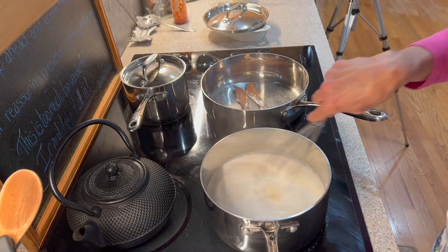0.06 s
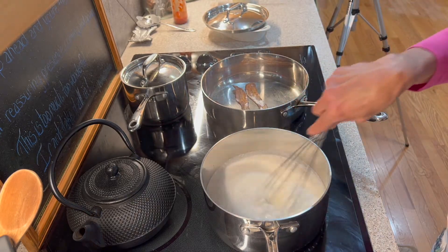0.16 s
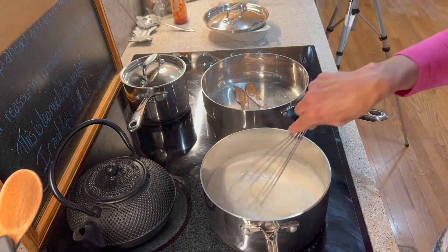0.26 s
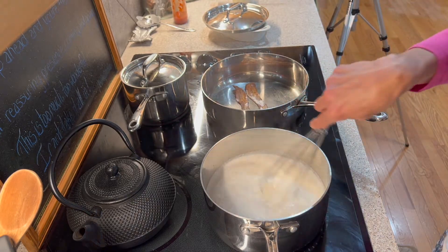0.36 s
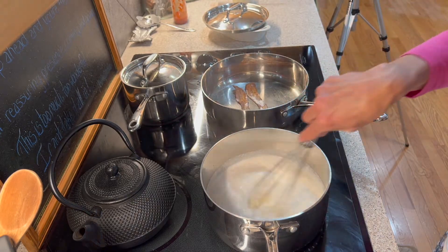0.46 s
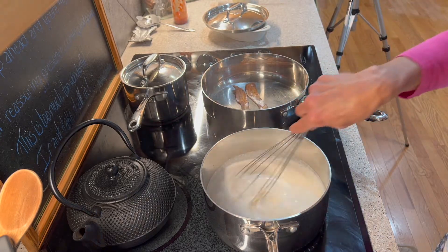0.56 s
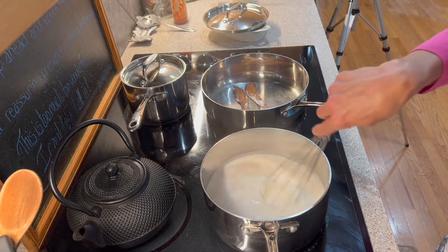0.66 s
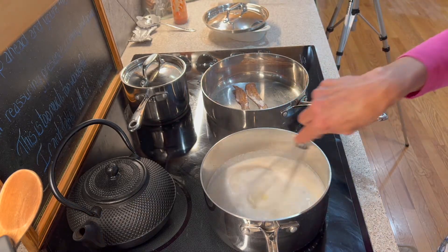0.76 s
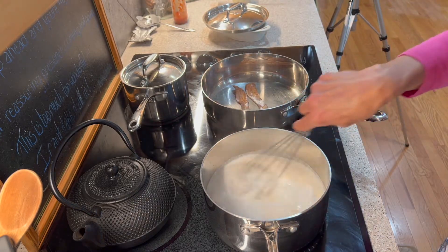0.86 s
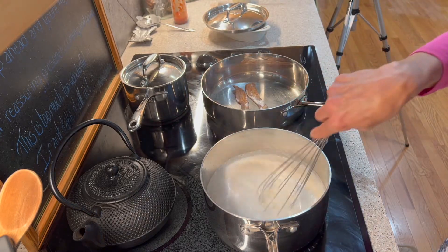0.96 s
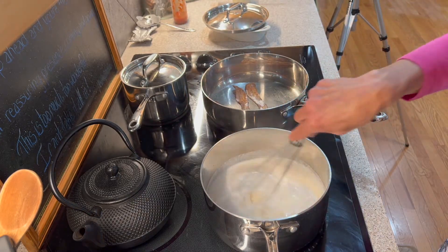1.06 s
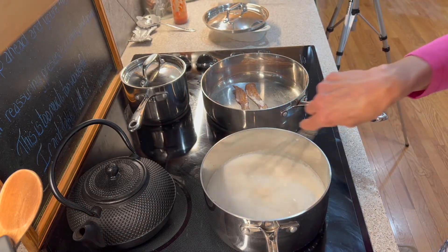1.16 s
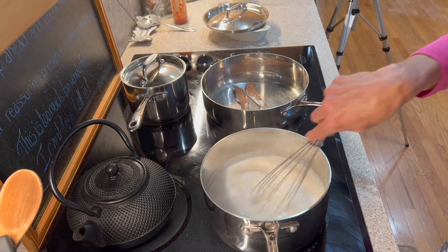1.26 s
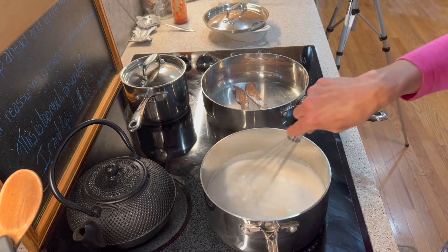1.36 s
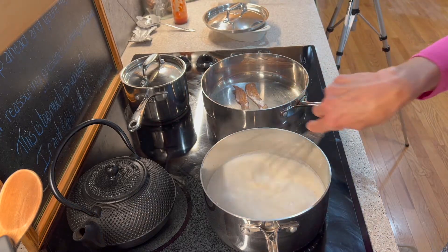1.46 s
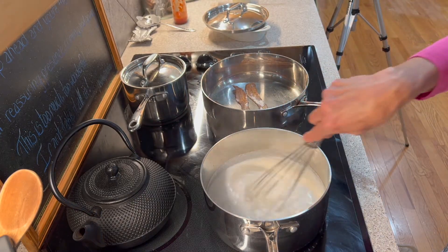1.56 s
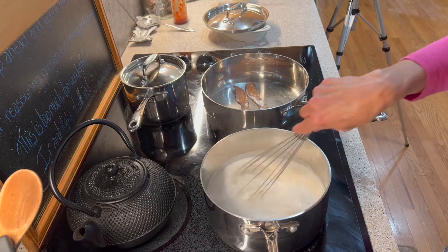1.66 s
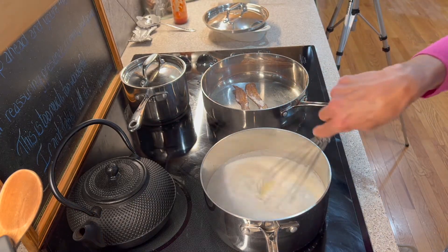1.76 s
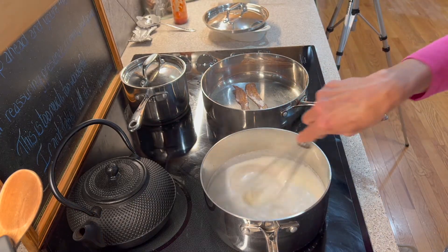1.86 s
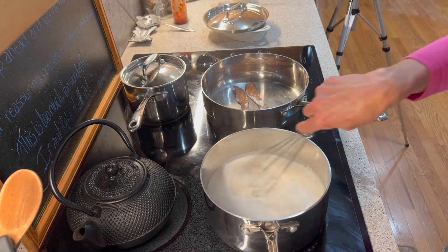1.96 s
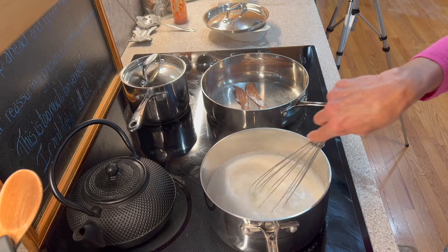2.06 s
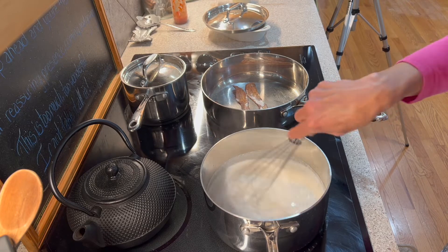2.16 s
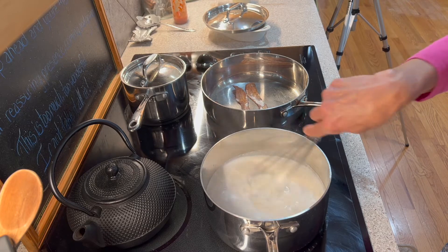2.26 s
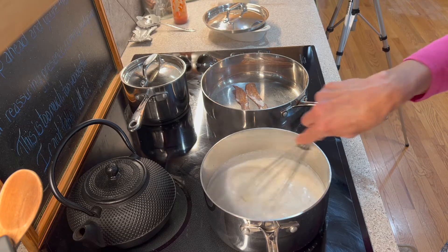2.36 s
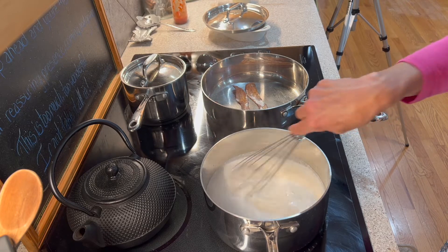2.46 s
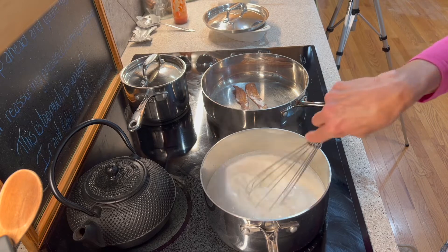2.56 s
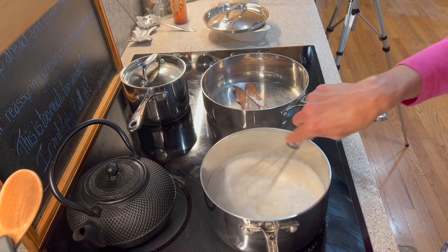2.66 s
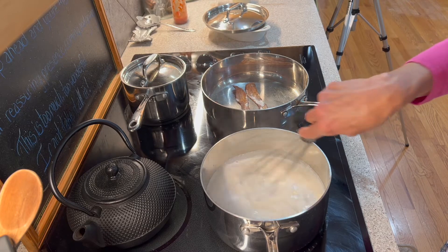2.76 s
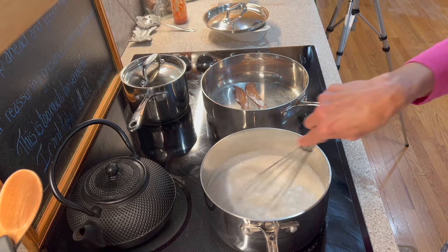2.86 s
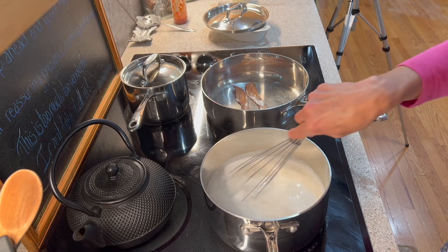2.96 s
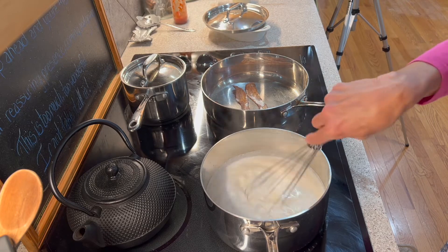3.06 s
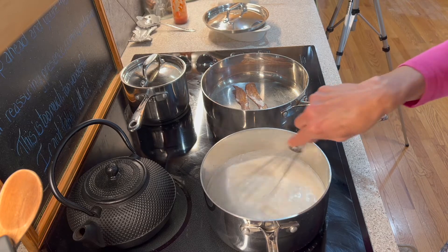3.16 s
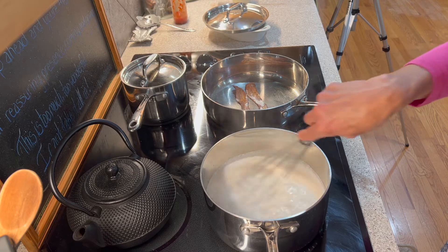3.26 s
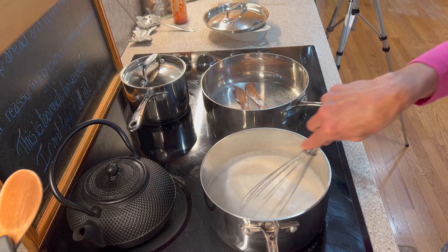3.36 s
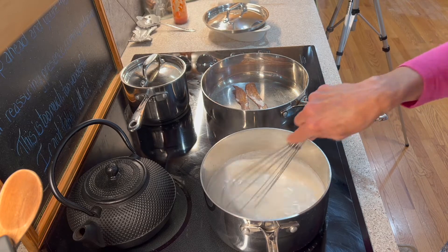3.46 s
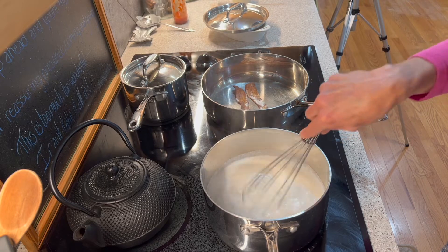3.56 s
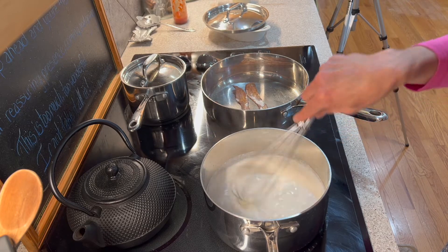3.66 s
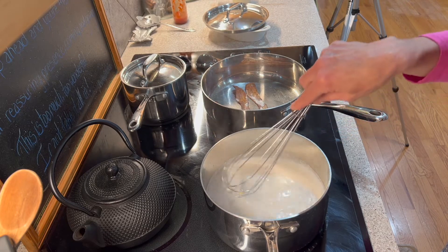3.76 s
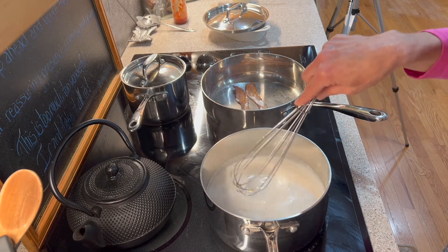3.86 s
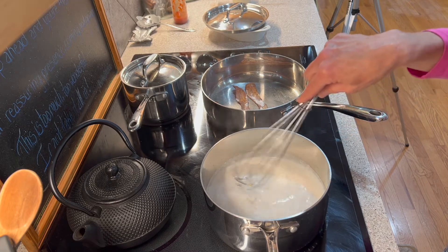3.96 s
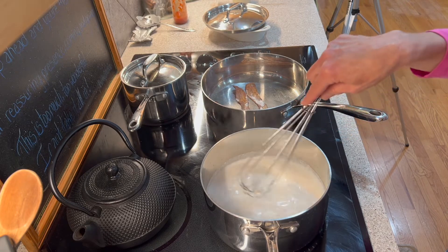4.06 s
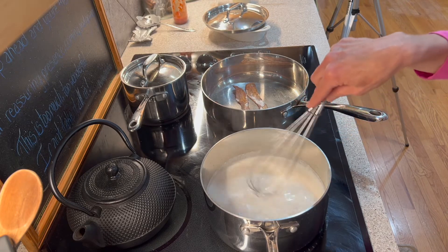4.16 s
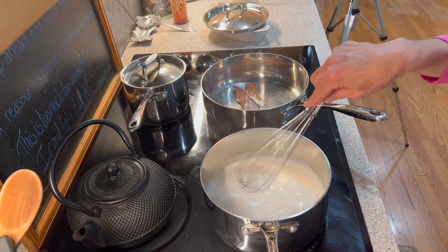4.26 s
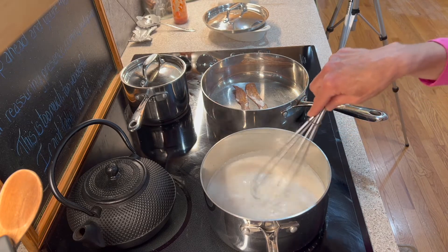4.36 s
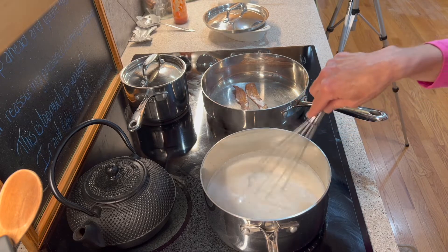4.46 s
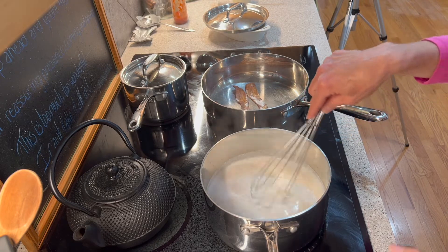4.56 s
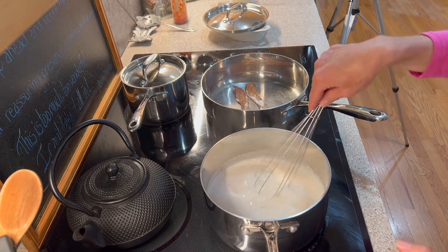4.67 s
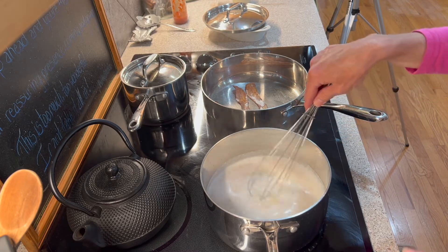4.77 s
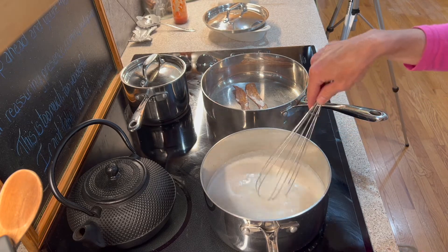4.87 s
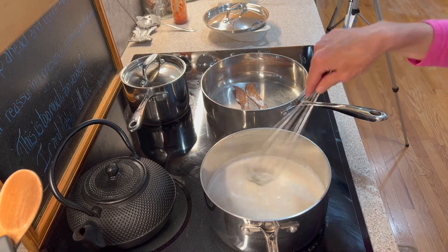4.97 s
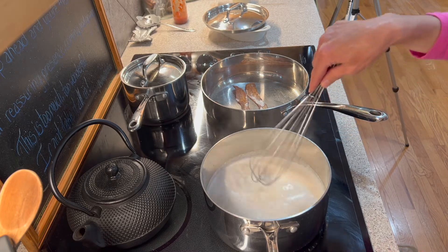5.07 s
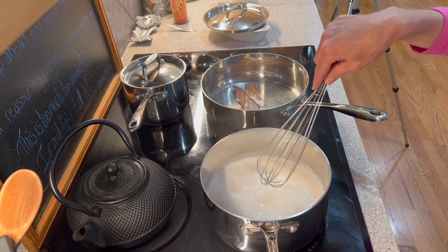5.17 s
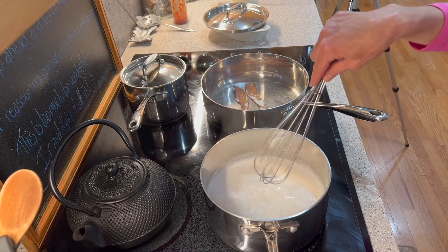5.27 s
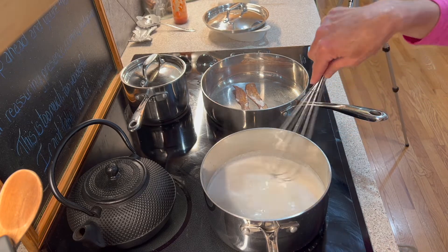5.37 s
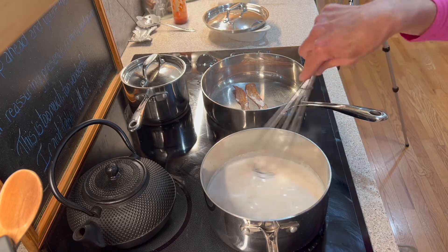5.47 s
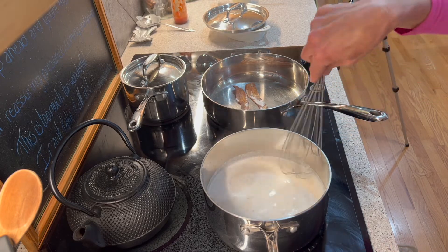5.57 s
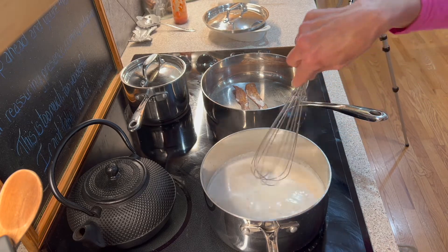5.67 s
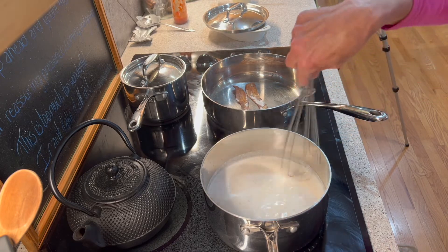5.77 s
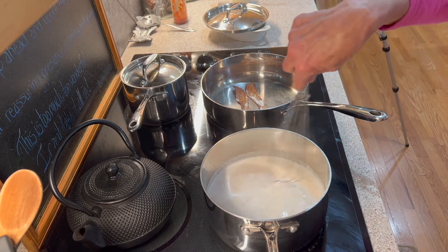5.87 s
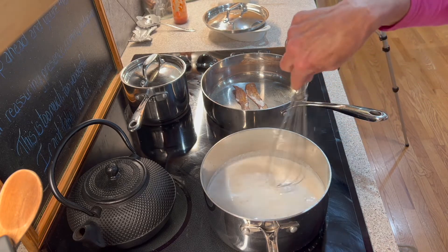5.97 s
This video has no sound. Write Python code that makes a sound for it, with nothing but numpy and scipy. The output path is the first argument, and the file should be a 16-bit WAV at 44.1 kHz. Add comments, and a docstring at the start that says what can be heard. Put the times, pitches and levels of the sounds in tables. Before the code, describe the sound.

A close microphone catches brisk, regular whisking: soft wet slosh, wiry metal scrape and airy swish, with occasional dull clunks and ticks. After about three and a half seconds it stops, leaving quiet sizzling, faint stirring and small plops. Finally the whisk is tapped three times on the pan rim, loud, rattling and briefly ringing in a small room.

```python
"""In a small kitchen, a wire whisk circles through grits in a steel pan, nearly four turns a second.
Each turn is shaped noise: a slosh of pushed grits, a scrape of dragged wires and a hiss of sweeping tips.
Stray knocks are ticks, pings and damped modes; after the whisk stops, bubbles plop and a faint stir grows.
Three raps on the rim, the first one double, make the wires rattle and the pan ring.
Bacon sizzles faintly in the next pan as filtered grains, over a low rumble of filtered noise."""
import sys
import numpy as np
from scipy import signal
from scipy.fft import rfft, irfft
from scipy.io import wavfile

SR = 44100
rng = np.random.default_rng(int(sys.argv[2]) if len(sys.argv) > 2 else 0)


def wav_out(sig):
    """Save sig, one row per channel (or a flat mono array), as 16-bit PCM at SR to the path in sys.argv[1]."""
    wavfile.write(sys.argv[1], SR, np.round(np.clip(np.atleast_2d(sig).T, -1, 1) * 32767).astype(np.int16))


N = 264587

# turns of the whisk: (time of the push [s], slosh [dB], scrape [dB], hiss of the wire tips [dB],
# delay from push to sweep [s], negative if the sweep comes first)
TURNS = [(.175, -54.5, -56, -52.5, 0.065), (.44, -62, -57.5, -57, 0.065), (.715, -60, -57, -50.5, .075),
         (1.0, -61, -55.5, -50, 0.079), (1.265, -60, -57.5, -57, 0.065),
         (1.531, -55.5, -55.5, -51.5, 0.098), (1.795, -62.5, -55, -49, 0.088),
         (2.056, -56.5, -55.5, -50, 0.084), (2.32, -56.5, -56, -53.5, .078), (2.575, -60, -55, -57, 0.073),
         (2.745, -57, -59, -61, 0.0082), (2.855, -57, -63, -56, 0.11), (3.054, -55, -57, -52, .14),
         (3.305, -57, -55.5, -58, .03), (3.479, -57.5, -60, -59.5, -0.047)]
# floor between turns, the whisk still touching the pan: (slosh [dB], scrape [dB], hiss [dB])
CONTACT_LEVELS = (-64.5, -56, -55.5)
# a last gentle stir: (time of the peak [s], rise [s], fall [s], only its size counts, slosh [dB], scrape [dB])
GENTLE_STIR = (6, 1.8, -7, -73, -78)
# colour of the stirred grits: (frequency [Hz], level [dB])
SLOSH_COLOUR = [(200, -19.5), (430, -11.5), (520, 1.5), (780, 0.5), (1020, -6.5), (1300, -8), (1520, -15.5),
                (2000, -8.5), (3500, -32)]
# resonances of the wires dragged on the pan's bottom: (frequency [Hz], half-width [Hz], level [dB])
SCRAPE_RESONANCES = [(1264, 162, 2.5), (1790, 91, -4), (2254, 350, 1), (3300, 266, 0.5), (4050, 450, -2),
                     (4510, 390, -5), (5130, 350, -2.5), (5150, 1330, -1), (6290, 154, 3), (6630, 230, 2.5),
                     (7420, 280, 2), (7930, 260, 0.5), (8550, 630, -1.5)]
# colour of the hiss of the wire tips: (frequency [Hz], level [dB])
HISS_COLOUR = [(1500, -13.5), (4000, -21.5), (8300, -23), (9200, -1), (10300, -4), (11400, -2), (12400, -4),
               (13050, -3.5), (13900, -7), (16000, -5.5)]
# the whisk knocks in the pan: (time [s], thud of the bottom [dB], factor on the bottom's pitch and decay speed,
# ping of a wire [dB], ring of the wall [dB], tick [dB], tick centre [Hz], tick half-width [octaves])
KNOCKS = [(0.157, -53, 0.65, -62, -69, -41, 3000, 1.3), (.198, -29, 1.03, -54, -60, -41.5, 3360, 0.71),
          (.701, -39.5, 1.54, -71, -72, -52, 1000, 0.97), (.731, -42.5, 1.01, -72, -72, -55, 900, 1.3),
          (1.013, -44, 1.1, -57, -77, -52, 2450, 0.52), (1.132, -67, 0.98, -72, -69, -46.5, 1560, 0.4),
          (1.498, -57, 1.2, -80, -72, -43.5, 5100, 0.38), (1.518, -42.5, 1.24, -66, -68, -40.5, 5000, 1.2),
          (2.851, -42, 1.33, -68, -68, -46, 1200, 1), (3.068, -46, 1.07, -77, -72, -47.5, 1300, 0.49),
          (3.262, -58.5, 1.3, -68, -64, -44, 7400, 0.33), (3.331, -43.5, 1.08, -68, -70, -48.5, 1200, .75),
          (3.704, -61, 0.95, -50.5, -70, -46.5, 4500, 1.5), (4.309, -59, 0.73, -71, -75, -59, 2400, 1.1),
          (4.777, -37.5, 1.84, -66, -58, -42, 1400, 3.9)]
# ping of a wire on the wall: (frequency [Hz], half-width [Hz], level [dB])
PING_RESONANCES = [(2400, 120, -3), (2340, 99, 1), (3070, 150, 2), (3940, 160, -4.5), (4230, 75, -17)]
# modes of the pan's bottom, damped by the grits, at pitch factor 1: (frequency [Hz], level [dB], t60 [s])
BOTTOM_MODES = [(130, -26, 0.052), (478, -5.5, 0.079), (523.6, 1, 0.059), (599, -2.5, 0.046),
                (763, 2, 0.026), (1067, -25, 0.11)]
# modes of the pan's wall and rim, left free to ring:
# (frequency [Hz], level [dB], t60 [s], change with the place of the rap [dB])
PAN_MODES = [(269, -9, .37, 0), (571, -8, .84, 2), (640, -8.5, .95, 0), (1149, -8, .33, -2),
             (1702, 5, .2, 8.5), (1893, 6.5, .11, 4), (2350, 2, .1, 1), (2580, -9, .47, 3),
             (3140, -12, .24, -1), (3437, .5, .28, -3.5), (4273, 0, .2, 3), (4370, 0, .12, 0),
             (4597, -6, .26, 6), (4870, -13, .21, 3), (5311, -5, .26, 4), (6240, -6, .11, -3)]
# bubbles burst in the hot grits: (time [s], frequency [Hz], level [dB])
PLOPS = [(4.437, 775, -57), (4.478, 604, -50), (4.592, 1170, -53), (4.672, 840, -56), (4.875, 830, -51)]
# raps on the rim: (time [s], clack [dB], length of the rattle [s], ring of the wires [dB],
# ring of the pan [dB], place along the rim, 0 in the middle)
RAPS = [(5.5282, -27, 0.014, -26.5, -42, -0.63), (5.5524, -39, 0.0013, -55, -55, -0.47),
        (5.7095, -22.5, 0.0041, -30.5, -43.5, 0.2), (5.867, -23, 0.0019, -51, -44.5, 0.73)]
# short-lived resonances of the clack: (frequency [Hz], half-width [Hz], level [dB])
CLACK_RESONANCES = [(258, 61, -3), (670, 150, -1), (1137, 234, -1), (1830, 65, 6), (2420, 220, 3),
                    (3250, 260, 1.5), (3540, 300, 3.5), (3830, 170, 2.5), (4480, 400, 5.5), (5460, 570, 6),
                    (6260, 270, 11.5), (7160, 240, 4), (7830, 440, 8), (8700, 500, 0.5), (9470, 450, 2.5),
                    (10000, 350, -1), (12140, 1100, 4), (15000, 3500, 2.5), (9250, 2600, -3)]
# how fast the clack dies: (frequency [Hz], t60 [s])
CLACK_DECAY = [(300, 0.28), (1800, 0.094), (5000, 0.065), (14000, 0.048)]
# modes of the whisk's wires: (frequency [Hz], level [dB], t60 [s])
WIRE_MODES = [(4275, -7, .04), (5065, -8, .04), (5342, -5, .055), (5570, 0, .04), (5638, -3, .035),
              (5780, -5, .03), (6240, -8, .03), (6420, -12, .03), (8910, -11, .045), (9630, -14, .05),
              (12420, -10, .045)]
# how fast the kitchen's reverberation dies: (frequency [Hz], t60 [s])
ROOM_DECAY = [(200, .4), (1000, 0.85), (3500, 0.56), (5600, 0.36), (9000, 0.47), (15000, 0.29)]
# colour of the kitchen rumble: (frequency [Hz], level [dB])
RUMBLE_COLOUR = [(15, -9.5), (35, 2.5), (55, -2.5), (85, 4), (120, 1), (185, -5), (280, 1), (420, -6.5),
                 (620, -6.5), (1000, -12), (1700, -21.5), (4000, -43), (12000, -69)]
# colour of the bacon sizzle: (frequency [Hz], level [dB])
SIZZLE_COLOUR = [(600, -14), (1800, -7), (3700, -1), (6000, -4), (8300, -4.5), (11500, -0.5), (14000, -1),
                 (16000, -2)]

TIME = np.arange(N) / SR  # [s]


def stirring(slosh_flutter_db=2.5, scrape_flutter_db=1.46, hard_db=-50, sing_db=-6):
    """Wires slip over grit and steel; the slips colour in the pan, and the grits churn."""
    slosh_gain, scrape_gain, hiss_gain = whisking()
    slosh = colour(grains(per_s=1500, spread_db=1.5), SLOSH_COLOUR)
    scrape = resonate(grains(per_s=12000, spread_db=1.13), SCRAPE_RESONANCES)
    hiss = colour(grains(per_s=19000, spread_db=2.1), HISS_COLOUR)
    slosh = patchy(slosh, depth_db=2.5, patch_hz=60, patch_s=0.015)
    scrape = patchy(scrape, depth_db=3.4, patch_hz=80, patch_s=0.02)
    hiss = patchy(hiss, depth_db=3.3, patch_hz=85, patch_s=0.022)
    # pressed hard, the tips sing: this grows with the square of the hiss
    press = hiss_gain / amp(hard_db)
    sing = amp(sing_db) * press * resonate(rng.standard_normal(N), [(13300, 640, 0)])
    friction = scrape * scrape_gain + (hiss + sing) * hiss_gain
    churn = slosh * slosh_gain
    slosh_flutter = amp(slosh_flutter_db * drift(41))
    scrape_flutter = amp(scrape_flutter_db * drift(38))
    return churn * slosh_flutter + friction * scrape_flutter


def whisking(ease_db_per_s=1.23, stop_s=3.485, stop_fade_s=0.028, tips_in_drag_db=-3):
    """Gains of slosh, scrape and hiss: a turn pushes the grits, drags the wires and sweeps their tips."""
    # all layers are summed as power; the contact between turns lightens, then stops
    touch = amp(-ease_db_per_s * TIME) ** 2 * swell(0, stop_fade_s, stop_fade_s, stop_s)
    slosh, scrape, hiss = (amp(db) ** 2 * touch for db in CONTACT_LEVELS)
    for push_s, slosh_db, scrape_db, hiss_db, delay_s in TURNS:
        sweep_s = push_s + delay_s
        push = amp(slosh_db) ** 2 * swell(push_s, rise_s=0.037, fall_s=0.033)
        drag = amp(scrape_db) ** 2 * swell(min(push_s, sweep_s), 0.052, 0.04, hold_s=abs(delay_s))
        sweep = amp(hiss_db) ** 2 * swell(sweep_s, rise_s=0.028, fall_s=0.026)
        slosh = slosh + push
        scrape = scrape + drag
        # the tips also hiss while the wires drag
        hiss = hiss + sweep + amp(tips_in_drag_db) ** 2 * drag
    peak_s, rise_s, fall_s, slosh_db, scrape_db = GENTLE_STIR
    gentle = swell(peak_s, rise_s, fall_s)
    slosh = slosh + amp(slosh_db) ** 2 * gentle
    scrape = scrape + amp(scrape_db) ** 2 * gentle
    return np.sqrt([slosh, scrape, hiss])


def swell(s, rise_s, fall_s, hold_s=0):
    """A bell-shaped rise to 1 at time s, a hold and a bell-shaped fall."""
    early = np.maximum(s - TIME, 0)
    late = np.maximum(TIME - s - hold_s, 0)
    return np.exp(-(early / rise_s) ** 2 - (late / fall_s) ** 2)


def patchy(x, depth_db, patch_hz, patch_s):
    """Parts of the spectrum swell and sink as different wires take the load."""
    hz, t, z = signal.stft(x, SR, nperseg=512)
    field = rng.standard_normal(z.shape)
    # blur the random field along frequency, then along time
    for axis, width in enumerate((patch_hz / hz[1], patch_s / t[1])):
        kernel = signal.windows.gaussian(41, width)
        field = np.apply_along_axis(np.convolve, axis, field, kernel, "same")
    return unit(signal.istft(z * amp(depth_db * unit(field)), SR, nperseg=512)[1][:N])


def knocks(rise_s=0.00034, tick_t60=0.033, ping_t60=0.125, swell_s=0.0029, wall_damping=2.15):
    """A wire ticks and pings on steel; the wall rings and the bottom thuds, higher where less grits load it."""
    out, t = np.zeros(N), np.arange(SR // 4) / SR
    # the wall dies faster while the whisk leans on it
    wall_modes = [(hz, db, t60 / wall_damping) for hz, db, t60, _ in PAN_MODES]
    for s, thud_db, pitch, ping_db, wall_db, tick_db, tick_hz, octaves in KNOCKS:
        contact = rng.standard_normal(len(t))
        off_centre = np.log2((bins(t) + 1) / tick_hz) / octaves
        bump = 1 / np.sqrt(1 + off_centre ** 4)
        tick = unit(irfft(rfft(contact) * bump, len(t))) * amp(tick_db - 60 * t / tick_t60)
        ping = resonate(contact, PING_RESONANCES) * amp(ping_db - 60 * t / ping_t60)
        thud = amp(thud_db) * ring(BOTTOM_MODES, t * pitch) * (1 - np.exp(-t / swell_s))
        wall = amp(wall_db) * ring(wall_modes, t)
        add(out, s, (tick + ping + wall + thud) * (1 - np.exp(-t / rise_s)))
    return out


def plops(t60=0.031, rise_s=0.0021):
    """Each bursting bubble rings briefly on one decaying sine."""
    out, t = np.zeros(N), np.arange(SR // 8) / SR
    for s, hz, db in PLOPS:
        add(out, s, ring([(hz, db, t60)], t) * (1 - np.exp(-t / rise_s)))
    return out


def raps(rise_s=0.0006, lowest_hz=95):
    """The wires chatter on the rim for some milliseconds; the place struck decides which pan modes ring."""
    out, t = np.zeros(N), np.arange(SR * 3 // 4) / SR
    for s, clack_db, rattle_s, wires_db, pan_db, place in RAPS:
        chatter = resonate(rng.standard_normal(len(t)), CLACK_RESONANCES)
        clack = amp(clack_db) * fade(chatter, CLACK_DECAY, hold=rattle_s)
        wires = amp(wires_db) * rattle(t, rattle_s)
        struck = [(hz, db + place * change_db, t60) for hz, db, t60, change_db in PAN_MODES]
        pan = amp(pan_db) * ring(struck, t)
        add(out, s, (clack + wires + pan) * (1 - np.exp(-t / rise_s)))
    # a small pan radiates little bass
    return signal.sosfilt(signal.butter(2, lowest_hz, "highpass", fs=SR, output="sos"), out)


def rattle(t, length_s, jostle=0.091):
    """Repeated contacts keep the wires going and jostle their phases; then they die away cleanly."""
    out, free_s = 0, np.maximum(t - length_s, 0)
    for hz, db, t60 in WIRE_MODES:
        steady = 2 * np.pi * (hz * t + rng.random())
        jolts = rng.standard_normal(len(t)) * (t < length_s)
        phase = steady + jostle * np.cumsum(jolts)  # jostle is in radians per sample
        out = out + amp(db - 60 * free_s / t60) * np.sin(phase)
    return out


def kitchen(x, first_s=0.0023):
    """Dense reflections from walls and worktop: random taps that die by frequency."""
    t = np.arange(SR // 2) / SR
    signs = rng.choice([-1., 1.], len(t))
    present = rng.random(len(t)) < 1 / 10
    tail = fade(signs * present * (t > first_s), ROOM_DECAY)
    return signal.fftconvolve(x, tail / np.linalg.norm(tail))[:N]


def background(rumble_db=-64, sizzle_db=-66, waver_db=-0.5):
    """Steady kitchen rumble, and fat bursting in countless tiny bubbles."""
    rumble = amp(rumble_db) * colour(rng.standard_normal(N), RUMBLE_COLOUR)
    sizzle_gain = amp(sizzle_db + waver_db * drift(25))
    sizzle = sizzle_gain * colour(grains(per_s=16000, spread_db=-2.0), SIZZLE_COLOUR)
    return rumble + sizzle


def grains(per_s, spread_db):
    """Tiny random impacts; a positive spread makes a few much larger, a negative one much smaller."""
    size = amp(spread_db * np.minimum(rng.exponential(1, N), 5))
    return size * rng.standard_normal(N) * (rng.random(N) < per_s / SR)


def drift(limit_hz):
    """Random wander of rms 1, with a spectrum falling off around limit_hz."""
    return unit(irfft(rfft(rng.standard_normal(N)) * np.exp(-(bins(TIME) / limit_hz) ** 2), N))


def ring(modes, t):
    """Struck modes, each a sine dying at its own speed."""
    return sum(amp(db - 60 * t / t60) * np.sin(2 * np.pi * hz * t) for hz, db, t60 in modes)


def resonate(x, peaks):
    """Passes x through a bank of (frequency [Hz], half-width [Hz], level [dB]) resonances, at rms 1."""
    power = sum(amp(db) ** 2 / (1 + ((bins(x) - hz) / width) ** 2) ** 2 for hz, width, db in peaks)
    return unit(irfft(rfft(x) * np.sqrt(power), len(x)))


def colour(x, points):
    """Filters x by a (frequency [Hz], level [dB]) curve, at rms 1."""
    return unit(irfft(rfft(x) * amp(read(points, bins(x))), len(x)))


def fade(x, t60s, hold=0):
    """After the hold [s], each frequency of x dies by its own t60."""
    hz, t, z = signal.stft(x, SR, nperseg=128)
    decay = amp(-60 * np.maximum(t - hold, 0) / read(t60s, hz)[:, None])
    return signal.istft(z * decay, SR, nperseg=128)[1][:len(x)]


def read(points, hz):
    """Reads a (frequency [Hz], value) table on a log-frequency axis."""
    f, value = np.transpose(points)
    return np.interp(np.log(hz + 1), np.log(f + 1), value)


def bins(x):
    """Frequencies [Hz] of the spectrum of x."""
    return np.fft.rfftfreq(len(x), 1 / SR)


def amp(db):
    """Decibels to gain."""
    return 10 ** (np.asarray(db) / 20)


def unit(x):
    """Scales to rms 1."""
    return x / np.sqrt(np.mean(x ** 2) + 1e-20)


def add(mix, s, sound):
    """Mixes a sound in at time s."""
    part = mix[max(round(s * SR), 0):][:len(sound)]
    part += sound[:len(part)]


def scene(room_db=-14.5):
    """The whisk and the pan, close by, in the kitchen."""
    pan = stirring() + knocks() + plops() + raps()
    return (pan + amp(room_db) * kitchen(pan) + background())[None]


def record(dry, edge_hz=15780):
    """A steep low-pass removes the top of the treble."""
    low_pass = signal.firwin(511, edge_hz, window=("kaiser", 9), fs=SR)
    return signal.oaconvolve(dry, low_pass[None], "same")


dry = scene()
out = record(dry)
wav_out(out)
```